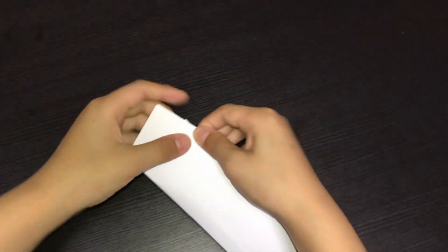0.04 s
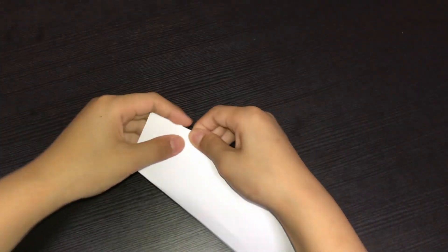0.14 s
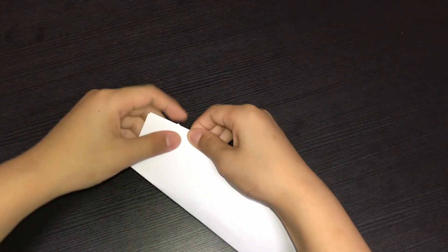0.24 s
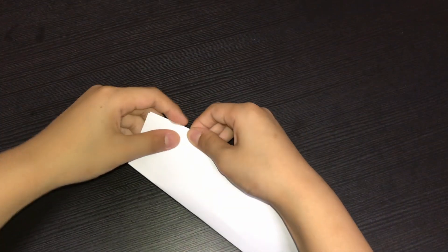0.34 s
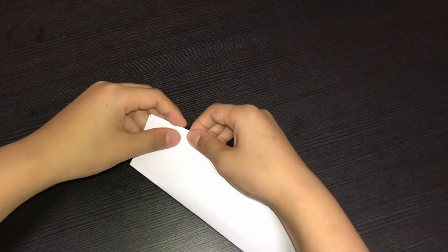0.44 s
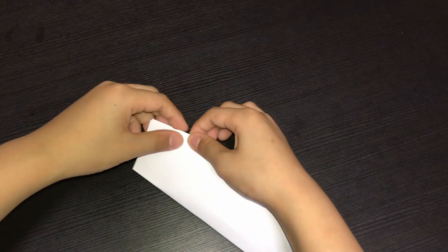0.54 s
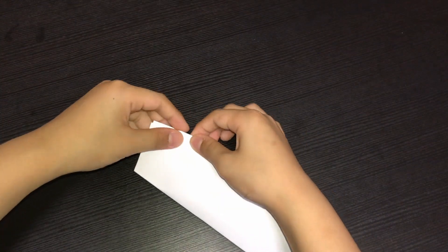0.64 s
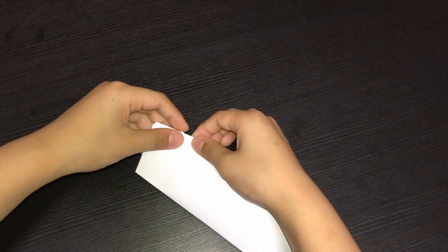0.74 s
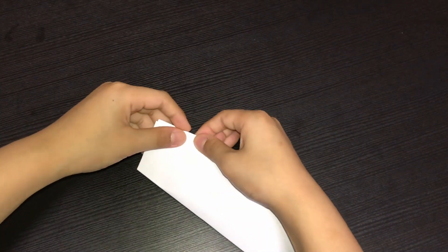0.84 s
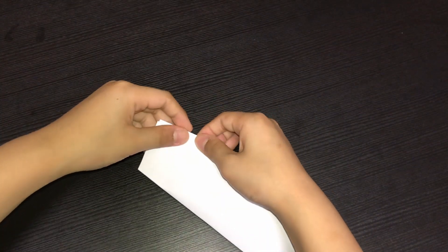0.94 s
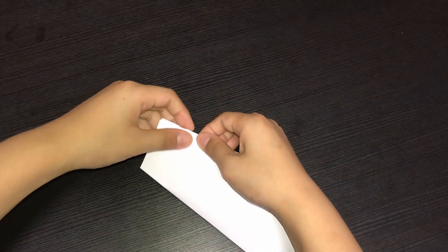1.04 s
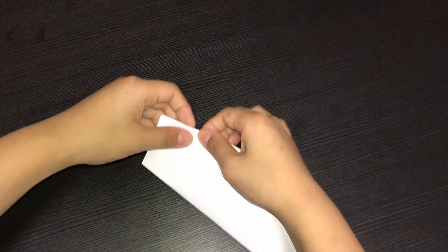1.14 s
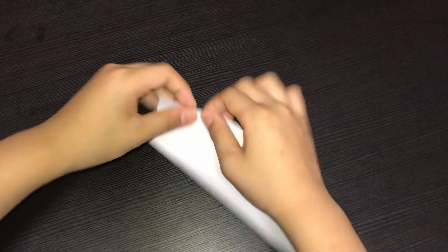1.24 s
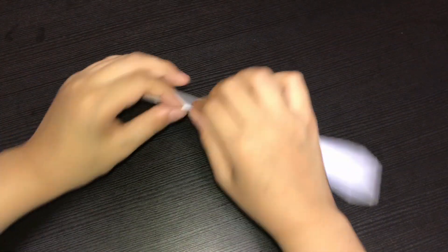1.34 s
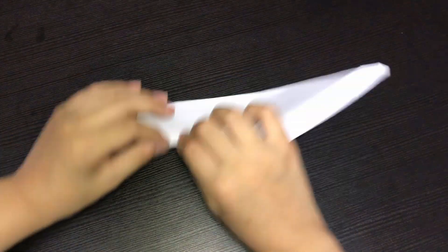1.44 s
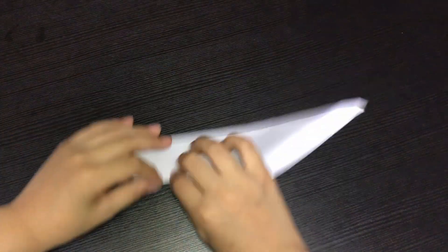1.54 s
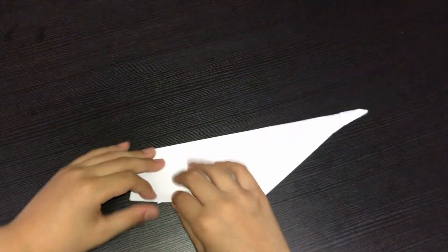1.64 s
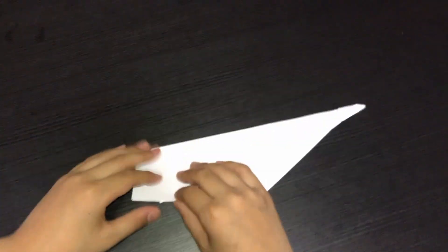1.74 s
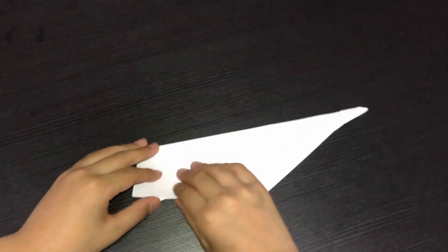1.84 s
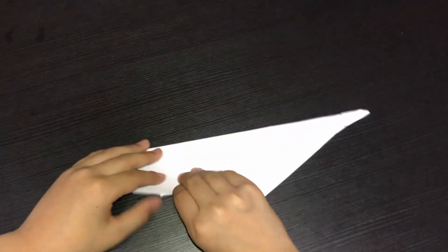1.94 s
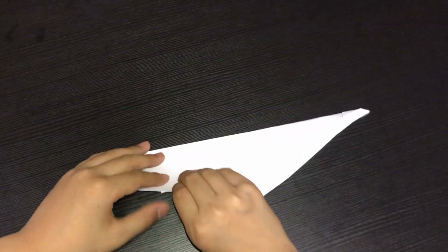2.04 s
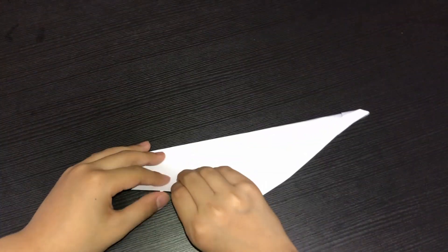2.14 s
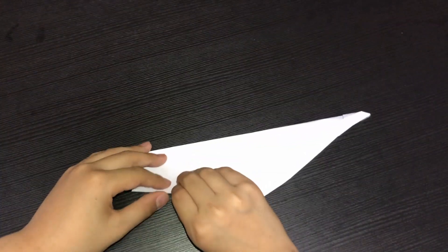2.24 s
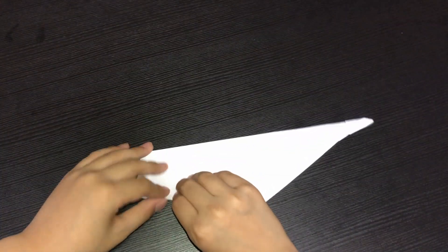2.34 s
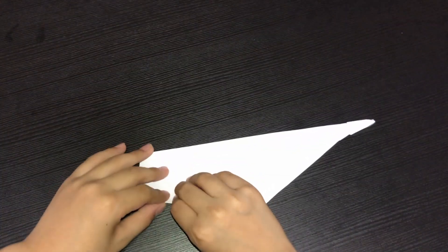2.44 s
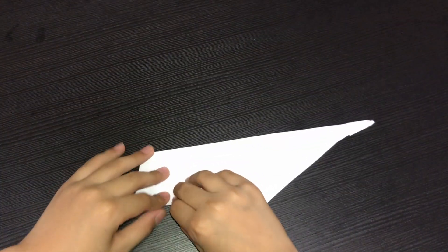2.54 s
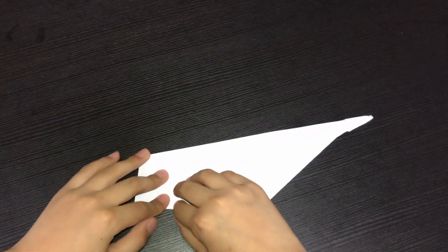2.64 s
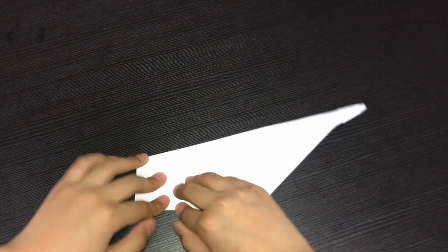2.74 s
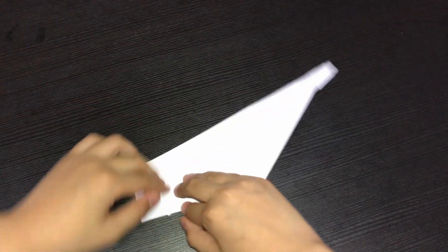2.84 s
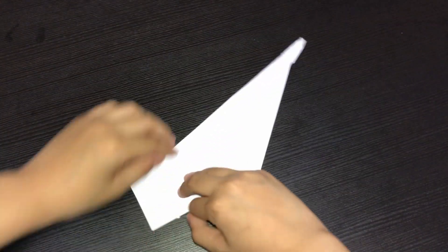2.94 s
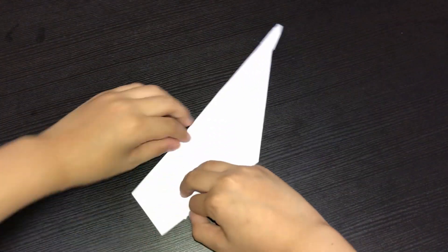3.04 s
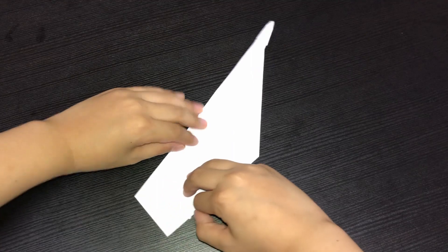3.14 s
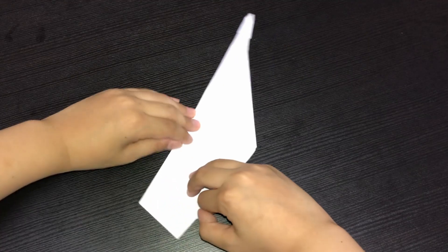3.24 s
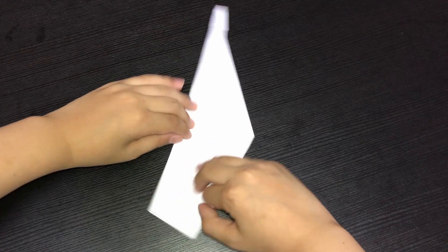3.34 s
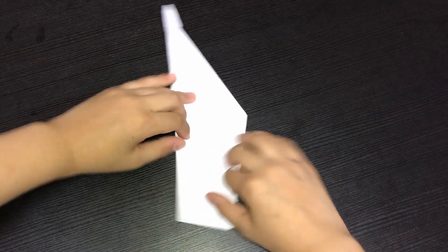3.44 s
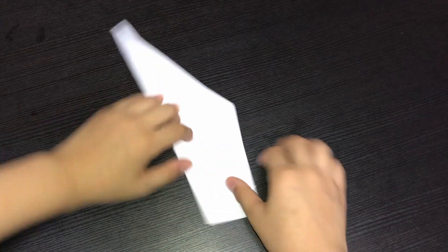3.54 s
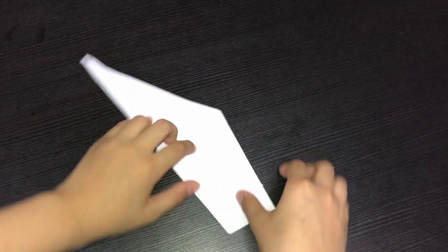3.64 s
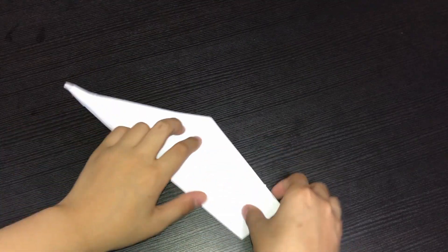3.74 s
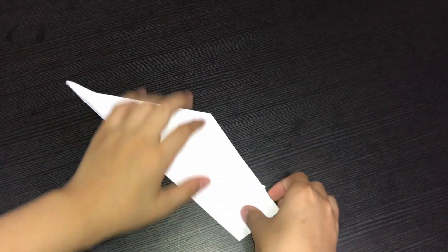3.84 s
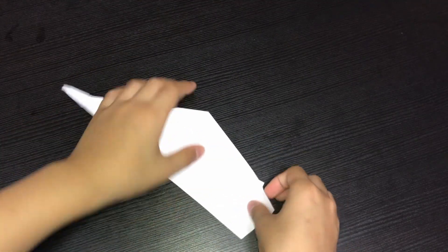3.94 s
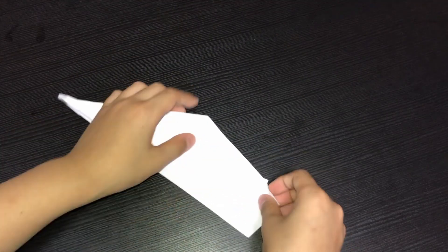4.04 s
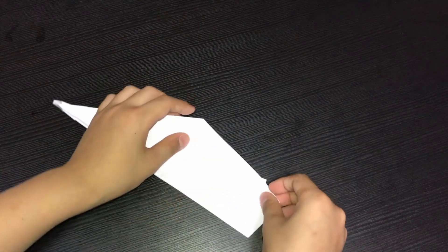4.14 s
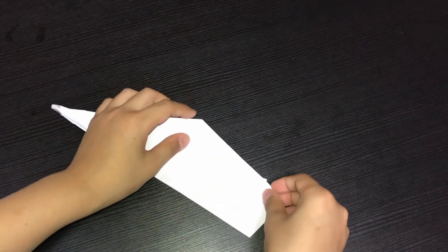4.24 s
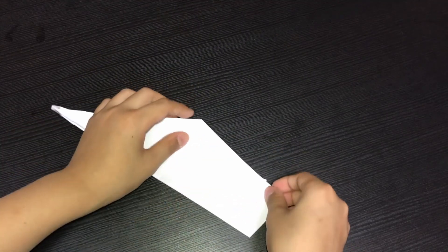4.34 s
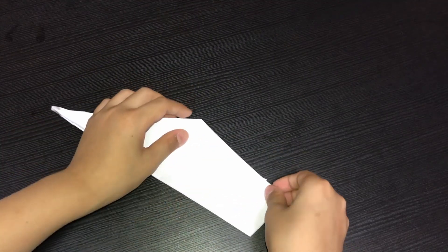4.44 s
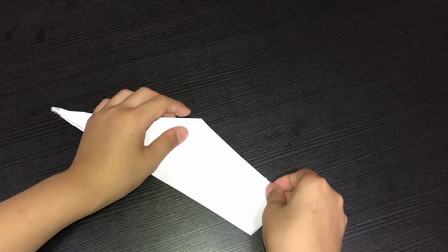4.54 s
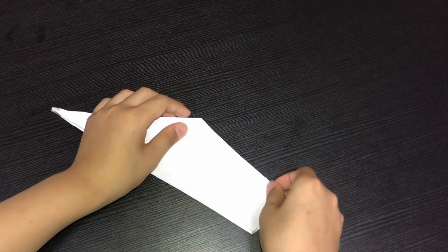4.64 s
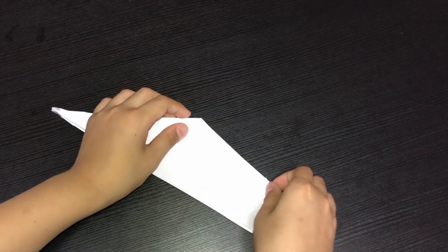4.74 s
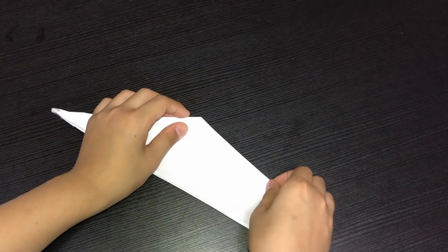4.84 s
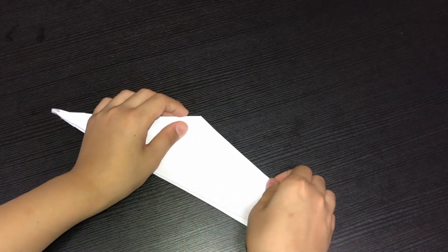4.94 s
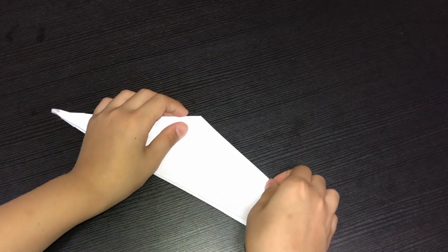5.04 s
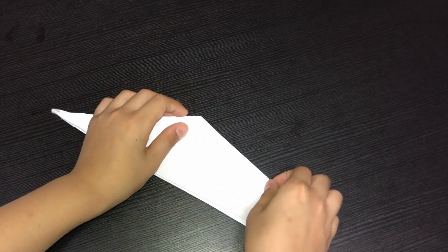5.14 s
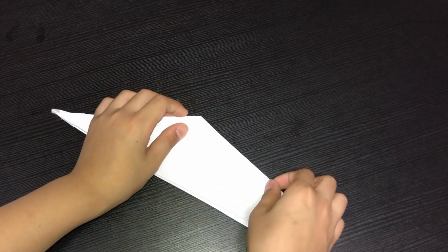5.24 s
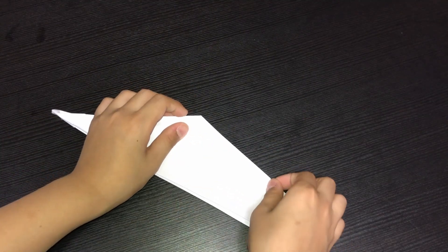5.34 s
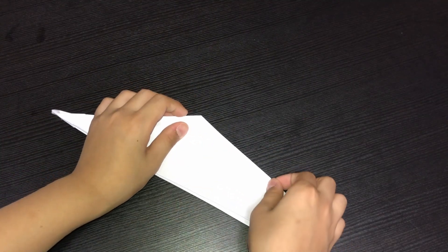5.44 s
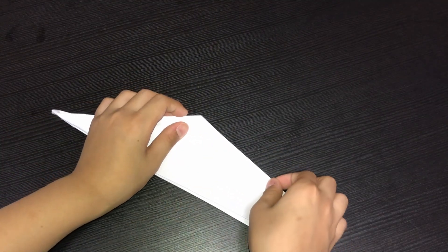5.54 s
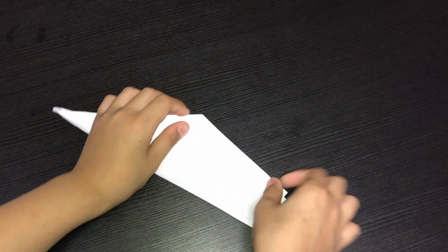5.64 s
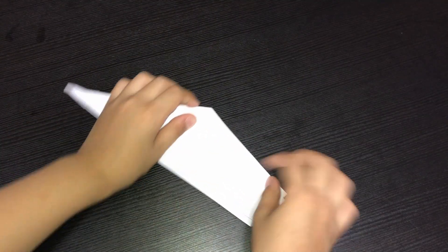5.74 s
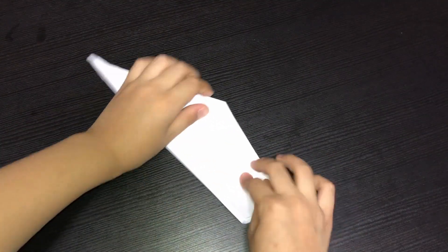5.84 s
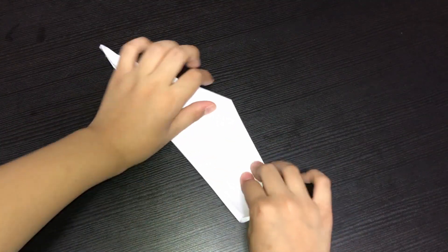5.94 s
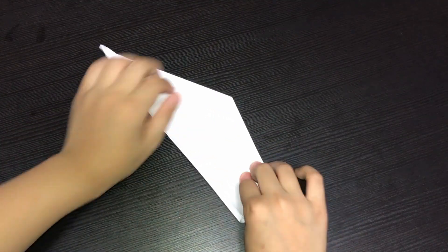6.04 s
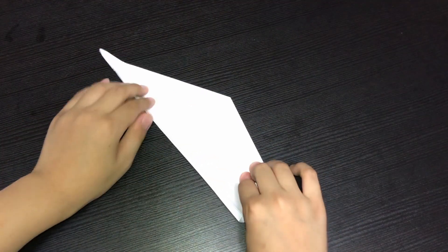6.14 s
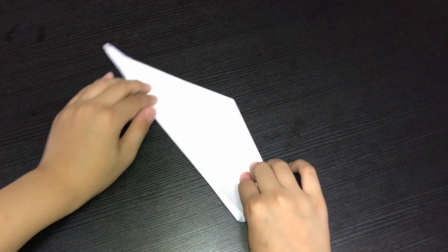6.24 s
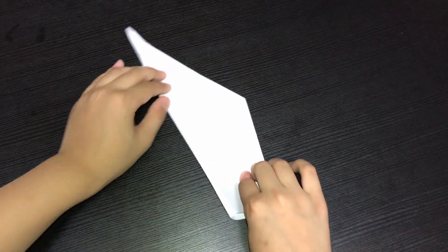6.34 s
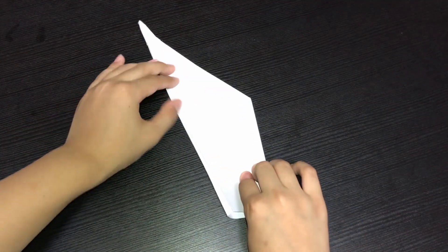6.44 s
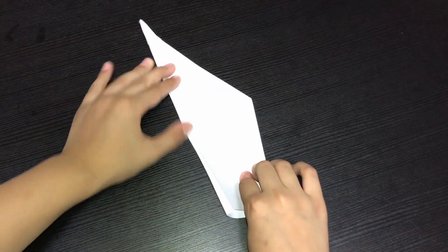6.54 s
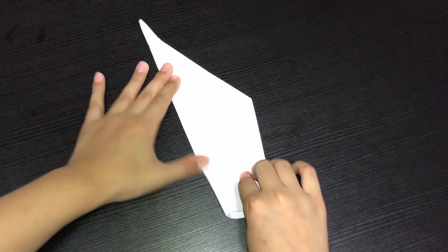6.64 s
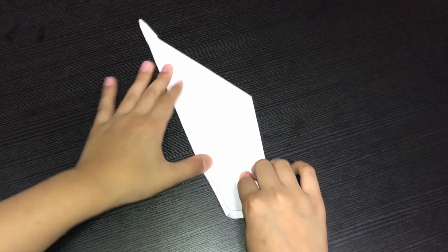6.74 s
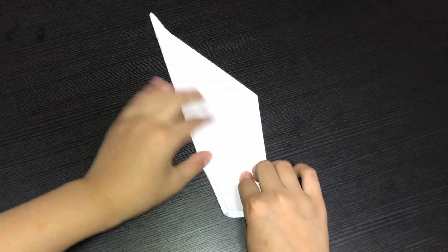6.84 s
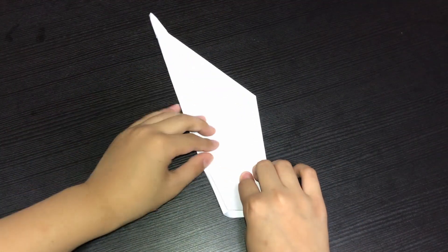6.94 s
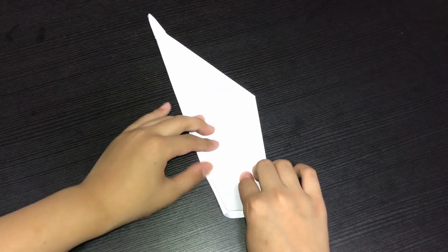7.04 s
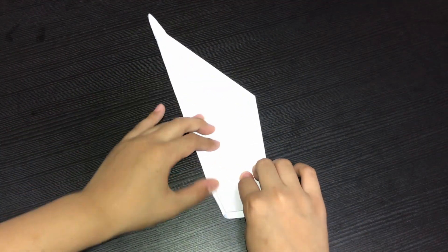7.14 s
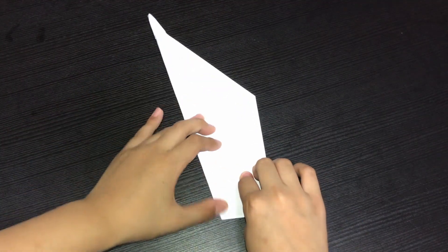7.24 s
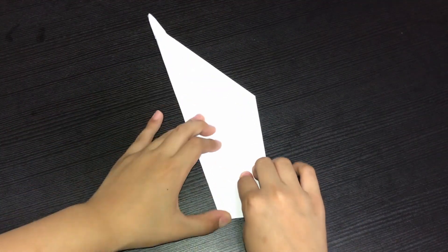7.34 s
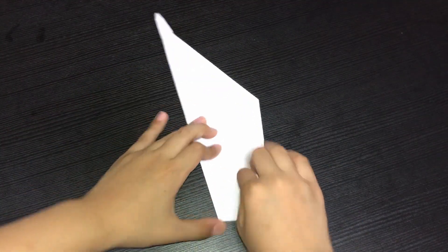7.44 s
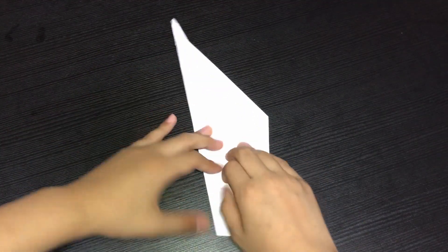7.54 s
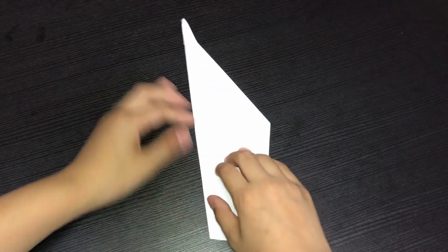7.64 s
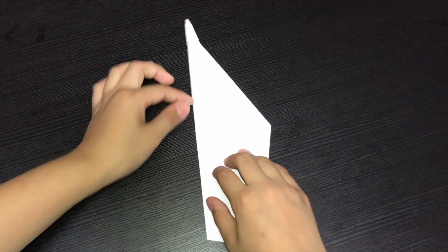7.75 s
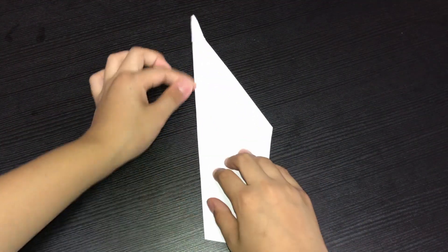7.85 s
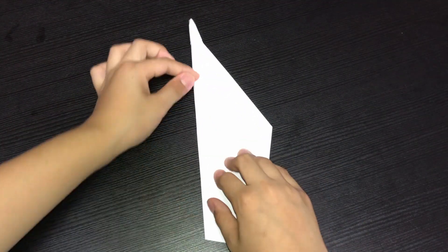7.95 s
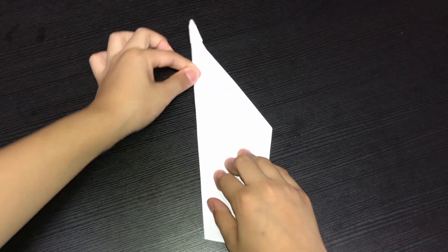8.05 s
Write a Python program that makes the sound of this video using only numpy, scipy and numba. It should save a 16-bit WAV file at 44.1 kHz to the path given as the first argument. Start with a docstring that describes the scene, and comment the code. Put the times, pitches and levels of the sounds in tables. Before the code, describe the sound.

A quiet room with a low, faint murmur of air. For the first second, fingers press a fold with soft rustle, tiny ticks and a barely audible airy whistle. A stroke at 1.2 leads to one very loud, bright paper snap at 1.54, with a dull desk thump and a low puff of air as the sheet turns over. Small crackles and a crisp scuff follow around 1.9 to 2.0, then sparse light rubbing. From 3.2 to 4.1 the paper slides and turns with gritty rustle, snaps and soft knocks. Between 4.2 and 5.3 there are delicate ticks and hissing crease rubs. A breathy stroke comes at 5.7, then sharper cracks at 6.1, 6.45, 6.6 and 6.77, with thumps and sliding. Long hissing rubs around 7.1 to 7.6 end in small crackles by 8. Close microphone, short room tail.

```python
"""A low steady murmur of room air and faint paper rustle, then hands folding and creasing a sheet on a desk.
Buckling panels snap as struck resonances; scuffs and strokes are gritty slips through bands that ring and hiss.
A rubbed crease whistles softly through the air gap; knuckles and dragging hands excite the desk modes.
Snaps, thumps and scuffs get a short room tail; a microphone and recorder filter shapes everything."""
import sys
import numpy as np
from scipy import signal
from scipy.fft import rfft, irfft
from scipy.io import wavfile
from scipy.ndimage import uniform_filter1d
from numba import njit

SR = 44100
rng = np.random.default_rng(int(sys.argv[2]) if len(sys.argv) > 2 else 0)


def store_pcm(level_fs):
    """Save levels as 16-bit WAV."""
    pcm = np.round(np.clip(level_fs, -1, 1) * 32767).astype(np.int16)
    wavfile.write(sys.argv[1], SR, np.atleast_2d(pcm).T)


N = 356328


def undb(db):
    """Decibels to amplitude."""
    return 10 ** (np.asarray(db) / 20)


def unit(x):
    """Scale to RMS 1."""
    return x / np.sqrt(np.mean(x ** 2))


@njit
def svf(x, centre_hz, width_hz):
    """State-variable band-pass with a moving centre, gain 1 at the centre."""
    y, band_state, low_state = np.empty(len(x)), 0., 0.
    for i in range(len(x)):
        g = np.tan(np.pi * centre_hz[i] / SR)
        k = width_hz[i] / centre_hz[i]
        v = (band_state + g * (x[i] - low_state)) / (1 + g * (g + k))
        band_state = 2 * v - band_state
        low_state += 2 * g * v
        y[i] = k * v
    return y


def band(x, centre_hz, width_hz):
    """Fixed two-pole band-pass, gain 1 at the centre."""
    return signal.lfilter(*signal.iirpeak(centre_hz, centre_hz / width_hz, fs=SR), x)


def walk(rate_hz):
    """Random levels, one per 1 / rate_hz s, joined by straight slews; RMS about 1.2."""
    hold = int(SR / rate_hz)
    steps = np.repeat(rng.standard_normal(N // hold + 1), hold)
    return 1.49 * uniform_filter1d(steps, hold)[:N]


def grit(clicks_per_s, spread_db, smooth):
    """Fibres slipping: random clicks of uneven but bounded size over a smooth share of noise."""
    chance = rng.random((3, N))
    size_db = np.minimum(-spread_db * np.log(chance[2] + 1e-9), 11.)
    clicks = (chance[0] < clicks_per_s / SR) * np.sign(chance[1] - .5) * undb(size_db)
    return unit(clicks) + smooth * rng.standard_normal(N)


def add(out, start_s, x):
    """Mix x into out at start_s, cut at the end."""
    i = int(start_s * SR)
    out[i:i + len(x)] += x[:N - i]


def air():
    """Spectrally shaped noise for room air, a narrow noise band for the building's hum, and one soft puff."""
    # room air spectrum: freq_hz, density_db (relative, per Hz)
    air_spectrum = [(44, -25), (75, 12), (184, 10.5), (774, -31), (1480, -32.5), (1740, -14.5), (7630, -33),
                    (8540, -46), (10400, -29), (13400, -26), (16000, -27.5)]
    air_db, swell_db = -60, 1.5
    hum_hz, hum_width_hz, hum_db = 41.2, 19, -56.5
    # turning the sheet over pushes a puff of air at the microphone
    flip_s, puff_db, puff_hz = 1.65, -36.5, 39.0

    hz = np.maximum(np.arange(N // 2 + 1) * SR / N, 1)
    f, db = np.transpose(air_spectrum)
    air_shape = undb(np.interp(np.log(hz), np.log(f), db))
    hum_shape = np.exp(-((hz - hum_hz) / hum_width_hz) ** 2)
    murmur = irfft(rfft(rng.standard_normal(N)) * air_shape, N)
    hum = irfft(rfft(rng.standard_normal(N)) * hum_shape, N)
    t = np.arange(N) / SR - flip_s
    puff = undb(puff_db) * np.exp(-(t / 0.042) ** 2) * np.sin(2 * np.pi * puff_hz * t)
    return unit(murmur) * undb(air_db + swell_db * walk(3.37)) + unit(hum) * undb(hum_db) + puff


def hands():
    """Stroke power adds to the hold: rustle, hiss, rumble, flap in dB, and rustle-weighted ring in Hz."""
    # fingers shifting their hold between strokes: time_s, rustle_db, hiss_db, rumble_db
    hold_levels = [(0.0, -72.5, -68.5, -59), (0.6, -66.5, -64.5, -62.5), (1.4, -69.5, -68, -60),
                   (2.3, -66, -62.5, -60.5), (4.2, -82.5, -60.5, -59.5), (5.0, -75.5, -68, -61),
                   (5.5, -77, -66.5, -63.5), (6.05, -79, -69, -57), (6.9, -62, -78, -65),
                   (7.33, -71, -78, -55), (7.7, -77, -65, -60.5), (8.08, -55.5, -63, -57.5)]
    # strokes of the hands over sheet and desk:
    # start_s, end_s, rustle_db, hiss_db, rumble_db, flap_db, ring_hz
    stroke_table = [(0.088, 0.17, -66, -60, -56, -58, 2267), (1.172, 1.306, -48, -57, -50.5, -53, 2410),
                    (1.547, 1.652, -48.5, -52, -58, -46.5, 2330), (1.97, 2.093, -59, -54, -75, -64, 4420),
                    (2.48, 2.68, -60.5, -73, -63, -63.5, 2980), (2.743, 3.166, -56, -62, -78, -84, 3200),
                    (3.229, 3.55, -51.5, -47, -59, -75, 3600),
                    (3.528, 3.712, -50, -49.5, -46.5, -51.5, 3700),
                    (3.77, 3.903, -53, -53.5, -68, -63, 3500), (3.966, 4.075, -51, -51, -44.5, -60, 3100),
                    (4.482, 4.712, -56, -56.5, -59, -84, 3850), (4.817, 4.896, -61, -61, -70, -74, 2930),
                    (5.01, 5.15, -68, -64, -60, -72, 3430), (5.643, 5.85, -50, -43.5, -54.5, -62, 3300),
                    (6.12, 6.193, -56, -81, -78, -76, 2350), (6.237, 6.396, -49.5, -48.5, -77, -72, 4960),
                    (6.45, 6.636, -49, -43, -54, -59.5, 3120), (6.733, 6.85, -51, -49, -50.5, -64, 3460),
                    (6.983, 7.197, -53, -51.5, -61, -62, 4100), (7.433, 7.536, -45, -47.5, -57, -70, 2480),
                    (7.785, 7.885, -76, -53.5, -78, -80, 3430)]
    hold_ring_hz, hold_flap_db = 2686, -71.5
    rise_db_per_s, fall_db_per_s = 273.5, 160
    arch_db = 3  # the hand is fastest mid-stroke: the ends are this much softer, besides the slopes

    t = np.arange(0, N, 32) / SR
    hold_s, *columns = np.transpose(hold_levels)
    levels_db = [np.interp(t, hold_s, c) for c in columns] + [np.full(len(t), hold_flap_db)]
    power = undb(2 * np.array(levels_db))
    weighted_hz = power[0] * hold_ring_hz
    for start, end, *db, hz in stroke_table:
        edge_db = np.minimum(np.minimum(rise_db_per_s * (t - start), fall_db_per_s * (end - t)), 0)
        position = np.clip((2 * t - start - end) / (end - start), -1, 1)
        shape = undb(2 * (edge_db - arch_db * position ** 2))
        power = power + undb(2 * np.array(db))[:, None] * shape
        weighted_hz = weighted_hz + undb(2 * db[0]) * shape * hz
    curves = (*10 * np.log10(power), weighted_hz / power[0])
    return [np.interp(np.arange(N) / SR, t, c) for c in curves]


def fibre_hiss(force):
    """The fine treble of paper on skin and wood gathers in a few wavering bands."""
    # hiss bands: centre_hz, width_hz (each of two passes), level_db
    hiss_bands = [(5630, 2000, 11), (9300, 2800, 15), (13900, 9800, 8)]
    waver_db = 2
    out = 0
    for k, (hz, width_hz, db) in enumerate(hiss_bands):
        gain = undb(db + waver_db * (walk(11.0) + walk(90)))
        out = out + (-1) ** k * gain * band(band(force, hz, width_hz), hz, width_hz)
    return unit(out)


def desk(force):
    """The desk top as a bank of decaying modes driven by a force."""
    # desk modes: freq_hz, level_db, t60_s
    desk_modes = [(96.3, 1, 0.2), (138.4, 1.5, 0.22), (167.7, 1.5, 0.17), (217.3, 0.5, 0.16), (264, 5, 0.1),
                  (324, 5.5, 0.093), (368.4, 2.5, 0.064), (524, -5.5, 0.084), (900, -28, 0.32),
                  (1084.5, -29.5, 0.21)]
    out = 0
    for k, (hz, db, t60_s) in enumerate(desk_modes):
        pole = np.exp(2j * np.pi * hz / SR - np.log(1000) / (t60_s * SR))
        out = out + (-1) ** k * undb(db) * signal.lfilter([1], [1, -pole], force).imag
    return out


def sheet_flap(flap_db):
    """Gritty shaking rings the modes of the whole sheet."""
    # whole-sheet rings: freq_hz, width_hz, level_db
    flap_modes = [(566, 106, 2.5), (690, 130, -2), (933, 97, -1), (1065, 52, 1.5), (1590, 680, -3.5)]
    shake = grit(300, spread_db=1.5, smooth=0.72)
    rings = sum((-1) ** k * undb(db) * band(shake, hz, width_hz)
                for k, (hz, width_hz, db) in enumerate(flap_modes))
    return unit(rings) * undb(flap_db + 3.66 * walk(35))


def crease_pops(rustle_db, hiss_db):
    """Tiny creases give way in short puffs of band-passed noise."""
    pop_ms = 2.8  # 1/e half-width
    ms = np.arange(-400, 400) * 1000 / SR
    clicks = np.abs(grit(38, spread_db=-2.0, smooth=0))
    puffs = signal.fftconvolve(clicks, np.exp(-(ms / pop_ms) ** 2), "same")
    level_db = np.minimum((rustle_db + hiss_db) / 2, -57.0) - 3.0
    return unit(band(puffs * rng.standard_normal(N), 3100, 5000)) * undb(level_db)


def sliding():
    """Slips ring the free sheet, fine fibres hiss, and the drag of the hands rumbles in the desk."""
    rustle_db, hiss_db, rumble_db, flap_db, ring_hz = hands()
    # the grip comes and goes; strokes that hiss louder press more evenly
    grip_db = walk(45) * np.interp(hiss_db, [-54, -52], [1.87, 1.53])

    slips = grit(700, spread_db=8.0, smooth=1.0)
    sheet = svf(svf(slips, ring_hz, 1.55 * ring_hz), ring_hz, 1.2 * ring_hz)
    rustle = sheet + 0.062 * band(band(slips, 2500, 2500), 2140, 3500)
    hiss = fibre_hiss(0.16 * slips + grit(3600, spread_db=16.0, smooth=1.0))

    pull = grit(200, spread_db=-0.5, smooth=1.63)
    desk_ring = unit(np.diff(desk(pull), prepend=0))
    rumble = desk_ring + 0.91 * unit(band(band(pull, 400, 750), 290, 3200))

    out = crease_pops(rustle_db, hiss_db) + sheet_flap(flap_db)
    out += unit(rustle) * undb(rustle_db + grip_db) + hiss * undb(hiss_db + grip_db)
    return out + unit(rumble) * undb(rumble_db + 1.84 * walk(30))


def flutter(noise, ring_hz, spots, ms):
    """After a snap the loose sheet shakes on unevenly, ringing narrow modes around the panel's pitch."""
    uneven = np.abs(np.repeat(noise[::128], 128))
    shake = noise * uneven * np.minimum(ms / 5.3, 1) * np.exp(-ms / 29.0)
    modes = sum(band(shake, ring_hz * 2 ** (2.1 * spot - 1.1), 280.0) for spot in spots)
    x = modes + 0.061 * band(shake, ring_hz, 2.0 * ring_hz)
    return x / np.abs(x).max()


def snaps():
    """A panel flips over: a jolt and chatter ring it, with a thin tick above and a dull flap below."""
    # buckling snaps: start_s, ring_peak_db, ring_hz, width_ratio (first pass width / ring_hz),
    # treble_db, body_db, flutter_db (all three relative to the ring's peak)
    snap_table = [(0.0618, -43.5, 1700, 0.3, -25, -30, -24), (0.4819, -32, 1660, 0.22, -21, -31, -28),
                  (0.492, -43, 1750, 0.22, -22, -36, -26), (0.511, -47, 1650, .3, -13, -28, -15),
                  (0.6544, -41.5, 2400, 0.65, -18, -16, -16), (0.809, -34, 2470, 0.75, -15.5, -21, -13),
                  (0.988, -40.5, 2050, 0.55, -13, -20, -12), (1.0058, -41, 1900, .6, -11, -24, -17),
                  (1.2454, -28.5, 3100, .14, -17, -24, -4.5), (1.5376, -2.5, 4500, 0.96, -41, -25, -21),
                  (1.5455, -9, 2700, 0.47, -25, -10, -18), (1.638, -23, 2670, .55, -16, -30, -11),
                  (1.877, -41, 3760, 0.82, -14, -33, -24), (1.923, -19, 3700, 1, -17, -20.5, -17),
                  (2.6021, -31.5, 5030, 0.65, -14, -18.5, -28), (2.843, -35.5, 4700, .6, -1.5, -16.5, -8),
                  (3.0894, -34, 2560, 0.25, -34, -11.5, -15), (3.3895, -22, 2700, 0.87, -36, -15.5, -13),
                  (3.4263, -24.5, 2880, 0.37, -25, -12.5, -11), (3.4883, -30, 5400, 0.38, -23, -14, -17),
                  (3.515, -39, 1500, .3, -25, -18, -22), (3.823, -27.5, 4640, 0.62, -15, -33, -27),
                  (3.8885, -28, 3700, 0.32, -10, -22, -11.5), (3.924, -15.5, 3240, 0.41, -32, -28, -21),
                  (3.979, -33, 4000, .6, -28, -9, -5), (4.32, -32, 3840, 0.77, -16, -26, -17),
                  (4.4701, -36.5, 3500, 1, -13, -33, -10), (4.601, -29, 3900, .9, -19, -22, -25),
                  (4.6057, -26.5, 4400, 0.25, -13, -26, -32), (4.996, -39, 5340, 0.59, -4.5, -15, -5),
                  (5.1312, -27.5, 3200, .2, -21, -40, -34), (5.241, -37.5, 2620, 0.39, -35, -33, -10),
                  (5.9463, -37.5, 3870, 0.25, -8, -40, -18), (5.953, -40, 3500, .6, -8, -35, -25),
                  (5.964, -27.5, 1920, 0.36, -34, -12.5, -14.5), (6.074, -32, 3150, 0.49, -14, -27, -0.5),
                  (6.104, -11, 3030, 0.31, -29, -19.5, -25), (6.114, -20, 2240, 0.55, -34, -22, -9.5),
                  (6.198, -31.5, 2280, 0.36, -35, -15, -5.5), (6.4445, -13.5, 2960, 1.0, -31, -25, -20),
                  (6.512, -35, 3200, .8, -16, -30, -25), (6.558, -29, 3280, .6, -18, -19, -15),
                  (6.591, -22.5, 3320, 0.8, -19, -20.5, -22), (6.6039, -14.5, 3460, 0.94, -32, -32, -24),
                  (6.7012, -30, 2280, 0.28, -28, -8, -8), (6.7651, -10, 3780, 0.99, -16.5, -23.5, -20),
                  (6.857, -38, 3400, .6, -18, -30, -25), (6.866, -23.5, 2700, 0.41, -18, -17, -7.5),
                  (6.8742, -17.5, 2840, 0.35, -24, -17, -33), (6.887, -33, 3410, 0.4, -29, -28, -25),
                  (7.1353, -28.5, 2200, 0.56, -22, -9.5, -10), (7.3648, -40.5, 1600, 0.66, -9, -15, 1),
                  (7.426, -26.5, 3050, 0.55, -10.5, -30, -33), (7.505, -20, 1840, 0.42, -22, -20, -32),
                  (7.7148, -37, 3450, .5, -22, -19, -5.5), (7.785, -32.5, 3550, 0.25, -10, -39, -8),
                  (7.8602, -31.5, 3150, 0.48, -18, -20, -13), (7.8896, -33, 3430, 0.43, -15, -26, -28),
                  (7.9613, -26.5, 2870, 0.26, -42, -13, -21)]
    chatter_ms = 1.97  # decay constant
    out, ms = np.zeros(N), np.arange(6144) * 1000 / SR
    noise = rng.standard_normal((len(snap_table), 4, len(ms)))
    spots = rng.random((len(snap_table), 6))
    jolt = np.exp(-((ms - .7) / 0.04) ** 2)
    chatter_env = np.minimum(ms / 0.36, 1) ** 2 * np.exp(-ms / chatter_ms)

    def energy(x):
        """Scale to unit RMS, with all the energy counted over 180 samples (4 ms)."""
        return x / np.sqrt(np.sum(x ** 2) / 180)

    for (s, db, hz, width, treble_db, body_db, flutter_db), n, spot in zip(snap_table, noise, spots):
        burst = jolt + 0.65 * n[:3] * chatter_env
        ring = band(band(burst[0], hz, width * hz), 0.82 * hz, min(1.72 * width, 2) * hz)
        tick = band(band(burst[1], 8700, 6000), 6500, 14000)
        flap = band(band(burst[2], 965, 1120), 440, 1350)
        crack = ring / np.abs(ring).max() + undb(treble_db) * energy(tick) + undb(body_db) * energy(flap)
        add(out, s, undb(db) * (crack + undb(flutter_db) * flutter(n[3], hz, spot, ms)))
    return out


def scuffs():
    """Short swells of dense slips that rise and fall with the finger's speed."""
    # quick scuffs of a finger or nail over the sheet:
    # centre_s, ring_db, length_ms (nominal), ring_hz, hiss_db (relative to the ring)
    scuff_table = [(0.116, -53, 50, 2930, -15), (0.269, -53.5, 11, 2680, -31), (0.415, -55.5, 39, 1710, 4),
                   (0.524, -51.5, 7.9, 2000, 1), (0.901, -52, 7, 2350, -3), (1.09, -56, 8, 1770, -8),
                   (1.259, -43, 55, 980, -28), (1.255, -46.5, 45, 3200, -20), (1.789, -52, 18, 4260, -2),
                   (1.879, -55.5, 64, 3900, 6), (2.04, -36, 32, 4220, -2.5), (2.332, -55.5, 65, 3700, -3),
                   (2.368, -55, 6.3, 4300, -15), (2.408, -53, 4.8, 3780, -16), (2.476, -50, 4.1, 4970, -8),
                   (2.524, -48, 12, 1820, -31), (2.601, -54.5, 32, 5560, 10), (2.842, -55.5, 130, 4700, 4),
                   (3.062, -49.5, 38, 6340, -6), (3.199, -47, 12, 3200, -6), (3.313, -50, 14, 2940, -14),
                   (3.734, -40.5, 40, 3900, -10), (3.821, -37, 27, 4160, 1.5),
                   (4.142, -46.5, 4.7, 4800, -6), (4.183, -47.5, 6, 4840, -2), (4.208, -47.5, 13, 4600, -8),
                   (4.227, -49, 5.2, 5000, 6), (4.272, -50.5, 5.6, 3460, 4), (4.294, -57, 8.6, 3650, 1),
                   (4.31, -54, 150, 3820, -4.5), (4.605, -49, 40, 3900, 1), (4.703, -56, 35, 5980, 8.5),
                   (4.873, -55.5, 56, 3300, -9), (5.03, -54, 8, 3530, 8), (5.123, -61.5, 26, 5200, 13.5),
                   (5.243, -53, 24, 2800, -20), (5.948, -43.5, 25, 3730, -9), (6.61, -41.5, 66, 3850, -1),
                   (6.87, -51, 8, 2720, -26), (7.134, -42.5, 140, 4600, 9), (7.791, -43, 44, 3660, -9),
                   (7.841, -39.5, 19, 3440, 0)]
    out, slips = np.zeros(N), grit(1500, spread_db=4.5, smooth=0.83)
    hiss = fibre_hiss(slips)
    for s, db, ms, hz, hiss_db in scuff_table:
        half = int(2 * ms * SR / 1000)
        here = slice(max(int(s * SR) - half, 0), int(s * SR) + half)
        t = np.arange(here.start, min(here.stop, N)) / SR - s
        swell = np.exp(-np.abs(t * 2200 / ms) ** 1.23)
        upper = band(band(slips[here], hz, .5 * hz), hz, 0.35 * hz)
        ring = unit(upper + 0.73 * band(slips[here], 0.72 * hz, 0.63 * hz))
        out[here] += undb(db) * swell * (ring + undb(hiss_db) * hiss[here])
    return out


def gap():
    """Rubbing a crease whistles softly: noise through two resonances of the air gap under the sheet."""
    # rubbing spells: start_s, end_s, level_db
    gap_spells = [(0.19, 0.54, -64), (4.457, 4.97, -62.5), (5.72, 5.82, -51.5), (7.335, 7.658, -56.5)]
    gap_hz, gap_width_hz = 1780, 230
    t, rub = np.arange(N) / SR, rng.standard_normal(N)
    gain = sum(undb(db) * np.clip(np.minimum(t - start, end - t) / 0.021, 0, 1)
               for start, end, db in gap_spells)
    whistle = band(rub, gap_hz, gap_width_hz) + 0.27 * band(rub, 1.56 * gap_hz, 2 * gap_width_hz)
    return gain * undb(1.3 * walk(15)) * unit(whistle)


def thumps():
    """A soft half-sine push rings the desk; paper under the hand adds a dry pat."""
    # knuckles and finger tips landing on the desk:
    # start_s, thump_peak_db, pat_db (relative to the thump), contact_ms (softer pad: longer, deeper)
    thump_table = [(1.536, -25.5, -11, 2.3), (2.528, -53, 9, 1.4), (2.625, -43, 1.5, 2.7),
                   (2.65, -43, -2, 2.6), (2.688, -49, -10, 3), (3.313, -40, 1, 1.5),
                   (3.483, -32.5, -6, 1.9), (3.546, -36, 1.5, 0.9), (3.564, -38, 1, 3.2),
                   (3.592, -38, -9, 1.1), (3.616, -44, -9, 1.2), (3.676, -38, -16, 0.83),
                   (3.707, -35, -25, 1.5), (3.953, -24, -14, 3.1), (3.966, -32.5, 0, 1.3),
                   (4.106, -52, 13.5, 2.8), (5.26, -42, -24, 7.4), (5.53, -46.5, -2.5, 1.8),
                   (5.828, -37, -6, 1.4), (6.097, -50, -22, 2.5), (6.486, -35, -28, 1.7),
                   (6.518, -24.5, -24, 1.5), (6.591, -37, -0.5, 1.6), (6.854, -31.5, -17, 1.9),
                   (7.146, -35, -20, 2.7), (7.22, -37.5, 0, 2.1), (7.364, -38.5, -4.5, 2.5),
                   (7.445, -44, -20, 3.8), (7.505, -36.5, -13, 6.8), (7.856, -46, -6, 2.7)]
    out, ms = np.zeros(N), np.arange(SR // 3) * 1000 / SR
    noise = rng.standard_normal((len(thump_table), len(ms)))
    for (s, db, pat_db, contact_ms), n in zip(thump_table, noise):
        blow = desk(np.sin(np.pi * np.minimum(ms / contact_ms, 1)))
        pat = band(band(n * np.exp(-ms / 9.9), 570, 440), 520, 820)
        add(out, s, undb(db) * (blow / np.abs(blow).max() + undb(pat_db) * pat / np.abs(pat).max()))
    return out


def room(x):
    """Diffuse echoes: noise bands that build within 0.8 ms and each fade at their own rate."""
    # room tail bands: centre_hz, t60_s, level_db (total energy)
    tail_bands = [(162, 0.52, -19), (597, 0.5, -22), (2020, 0.1, -19), (5060, 0.37, -33),
                  (10700, 0.21, -11)]
    t = np.arange(SR // 2) / SR
    tail = 0
    for hz, t60_s, db in tail_bands:
        envelope = undb(-60 * t / t60_s) * np.minimum(t / 0.00079, 1) ** 2
        part = band(rng.standard_normal(len(t)), hz, 2.06 * hz) * envelope
        tail = tail + undb(db) * part / np.sqrt(np.sum(part ** 2))
    return x + signal.fftconvolve(x, tail)[:N]


def scene():
    """Snaps, thumps and scuffs in the room; sliding, gap whistle and air added dry."""
    return (room(snaps() + thumps() + scuffs()) + sliding() + gap() + air())[None]


def record(dry):
    """The microphone drops the deepest bass and dips near 10 kHz; the recorder cuts the top."""
    top_hz = 15750
    dipped = dry - 0.5 * band(dry, 10190, 2200)
    port = signal.sosfilt(signal.butter(4, 33., "high", fs=SR, output="sos"), dipped)
    return signal.sosfilt(signal.ellip(10, .2, 70, top_hz, fs=SR, output="sos"), port)


dry = scene()
out = record(dry)
store_pcm(out)
```